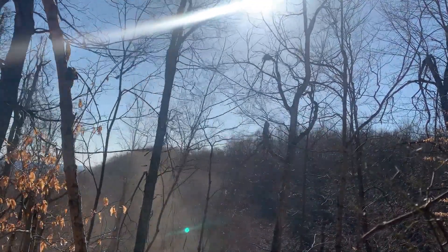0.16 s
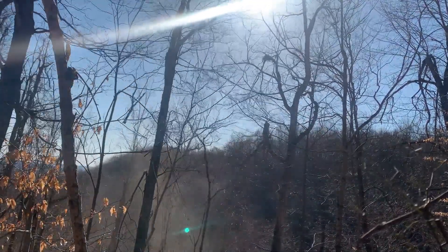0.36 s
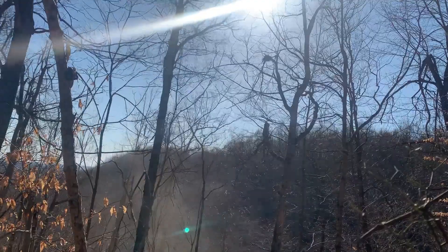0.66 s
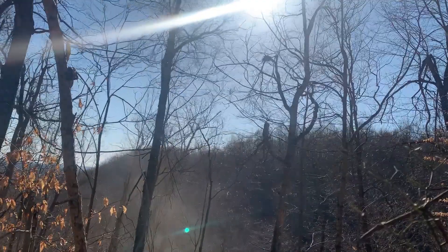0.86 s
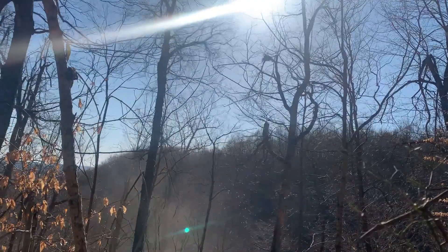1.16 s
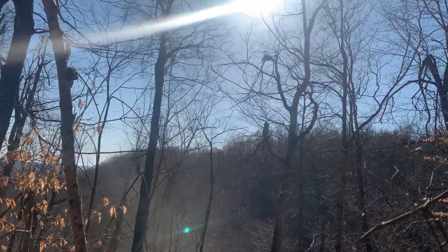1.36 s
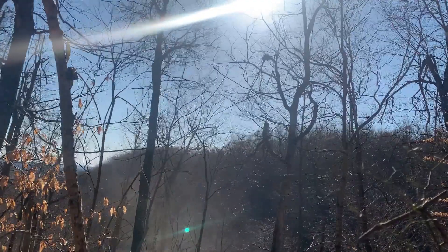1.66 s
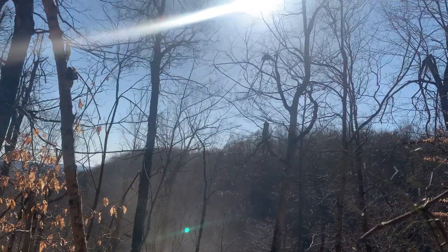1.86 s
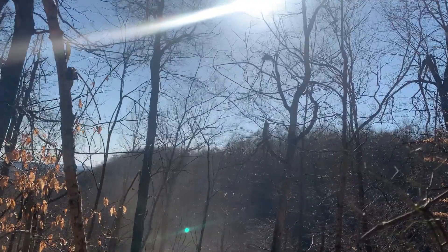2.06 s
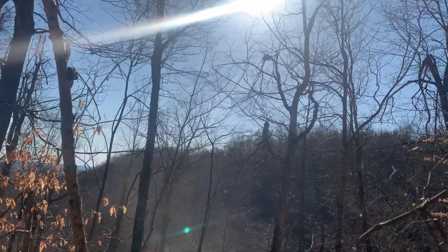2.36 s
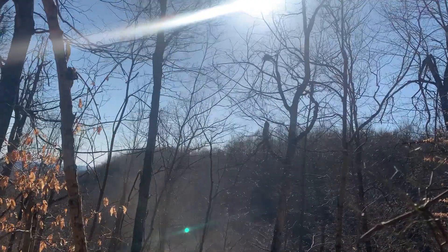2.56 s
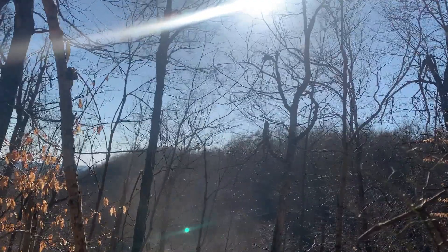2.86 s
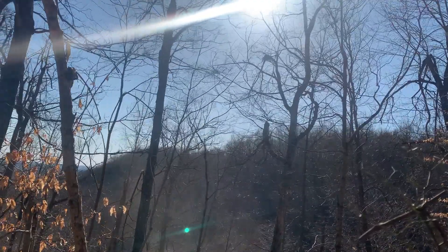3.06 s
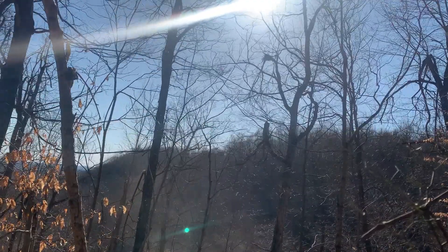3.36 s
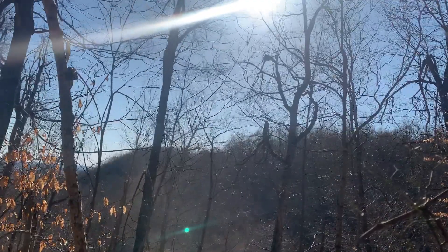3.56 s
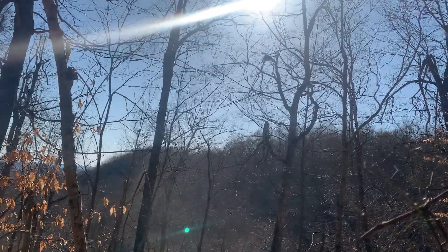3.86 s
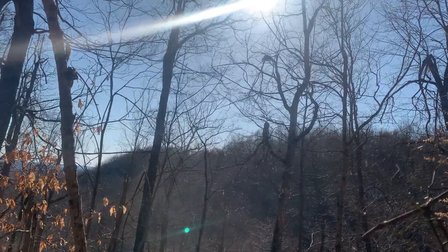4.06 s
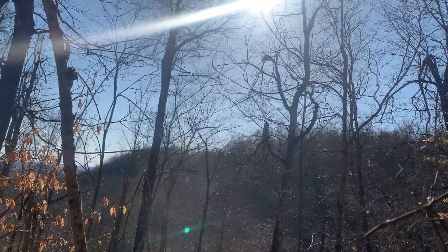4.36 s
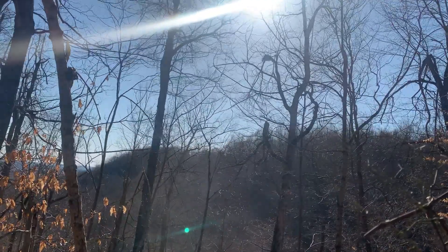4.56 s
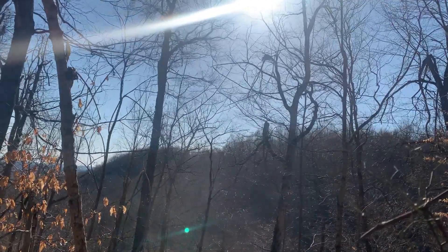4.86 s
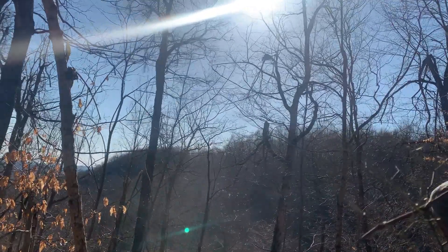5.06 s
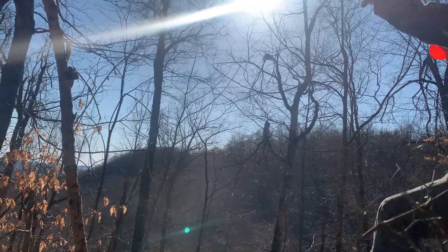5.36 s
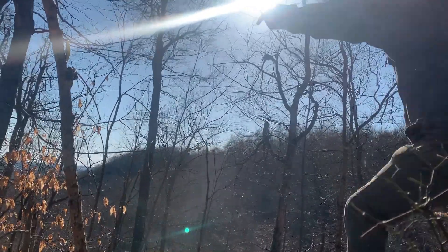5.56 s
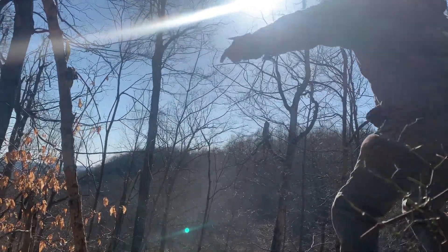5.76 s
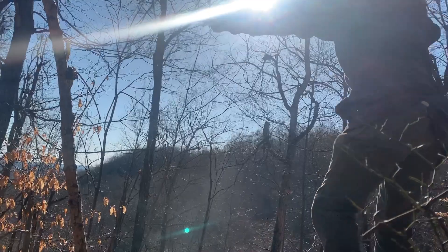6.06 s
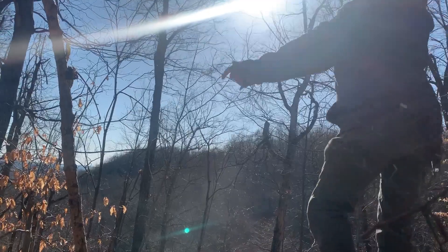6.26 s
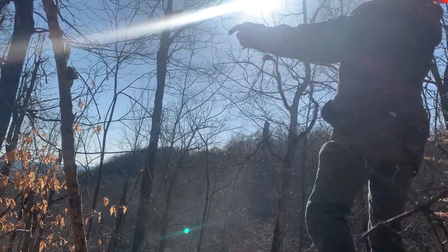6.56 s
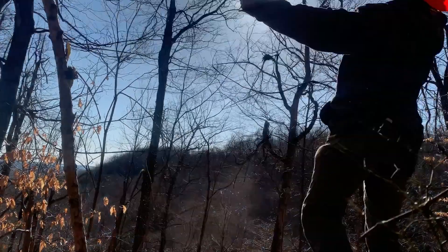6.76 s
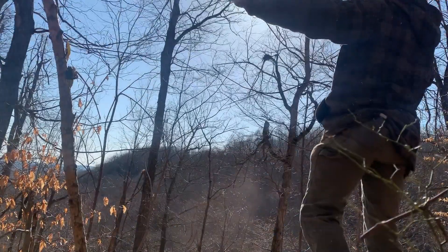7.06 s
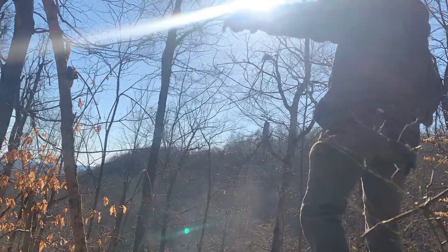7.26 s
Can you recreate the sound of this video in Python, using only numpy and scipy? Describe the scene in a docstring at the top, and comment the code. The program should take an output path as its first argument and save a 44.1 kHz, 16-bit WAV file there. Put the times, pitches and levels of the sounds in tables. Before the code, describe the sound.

Branches snap and heavy wood thuds down in a forest; an engine idles while someone walks in over dry leaves, breaking sticks.

```python
"""A felled tree settles in a winter wood.

Limbs fracture and ring, the trunk thumps the ground, and the many small impacts of falling debris
merge into a fading noise. To the right an idling engine pulses through its exhaust pipe; someone
walks in from that side, crushing dry leaves and snapping twigs. A log is knocked at the left.
Bare trunks scatter the blows, and a phone hears it all through two spaced microphone ports."""
import sys
import numpy as np
from scipy import signal
from scipy.fft import rfft, irfft, next_fast_len
from scipy.io import wavfile
from scipy.ndimage import uniform_filter1d, map_coordinates

SR = 44100
rng = np.random.default_rng(int(sys.argv[2]) if len(sys.argv) > 2 else 0)


def wav_record(signal):
    """Record a signal, one row per channel, as 16-bit PCM in the file named by sys.argv[1]."""
    frames = np.transpose(np.atleast_2d(signal))
    bounded = np.clip(frames, -1, 1)
    # unit amplitude maps onto the largest positive 16-bit level
    quanta = np.round(bounded * 32767).astype(np.int16)
    wavfile.write(sys.argv[1], SR, quanta)


N = 327222

# Engine loudness as heard, dipping at the crash and rising as the phone's gain recovers.
# Each row: time in seconds, level in dB, extra rasp in dB.
ENGINE_AS_HEARD = [(0.0, -37, 0), (0.6, -41, 10), (1.14, -37, 4), (2.2, -36.5, 3), (3.0, -35, 1.5),
                   (3.8, -34.5, 0), (4.1, -34.5, 2.5), (5.2, -32.5, 6), (5.55, -33, 3.5), (5.7, -33.5, 0),
                   (5.85, -32.5, 2.5), (6.15, -30.5, -0.5), (6.35, -33, 3.5), (6.55, -31.5, 2.5),
                   (6.67, -32.5, 0.5), (6.78, -31.5, 2), (6.92, -32, -1), (7.2, -32, -3), (7.35, -32, 5.5),
                   (7.42, -28.5, -1.5)]
# Response of the exhaust pipe. Each row: multiple of the firing rate, relative gain in dB.
PIPE_ORDERS = [(1, -42), (2, -13), (3, 0), (4, 0), (5, -9), (6, -14), (7, -15), (8, -21), (9, -24),
               (10, -25), (11, -30)]
# Spectra of the noise sources. Each row: frequency in Hz, relative spectral density in dB.
ROAR_SPECTRUM = [(25, -28), (33, -9), (55, -6), (75, 0.5), (97, 3), (135, -6), (220, -25.5), (330, -15),
                 (500, -11), (640, -18.5), (750, -24), (1200, -22.5), (2000, -34.5), (6000, -40.5),
                 (16000, -68)]
RASP_SPECTRUM = [(1300, -12), (1600, 0), (2000, 1), (2350, -1.5), (2650, -10.5), (2950, -5.5), (3300, -20),
                 (5000, -38)]
LEAF_SPECTRUM = [(700, -4.5), (1200, -8.5), (1900, 0), (2600, 0.5), (3300, 1.5), (4200, -0.5), (4700, -0.5),
                 (5300, 0), (6500, -3), (7700, -1.5), (9500, -1.5), (11200, -18), (13000, -32)]
DRY_EDGE_SPECTRUM = [(7500, -28), (9500, -37), (10500, 1.5), (11500, -3.5), (13000, 0.5), (16000, 0)]
SOIL_SPECTRUM = [(70, -27), (150, 8.5), (300, 2.5), (500, 0.5), (700, -10.5), (1200, -36)]
TWIG_SPECTRUM = [(1500, -11.5), (2500, -3.5), (5000, -4), (6500, -3.5), (8000, 1), (9600, -5), (11200, -3),
                 (13000, -7), (16000, -11.5)]
LIMB_SPECTRUM = [(200, -19), (450, 0.5), (1000, -1), (1600, 0), (2200, -4), (3500, -9.5), (6000, -13)]
TRUNK_SPECTRUM = [(50, -1), (100, -14.5), (140, 1.5), (220, -3.5), (350, -18), (600, -39)]
# Knocks on the log. Each row: start in seconds, tap level in dB, body level in dB.
LOG_KNOCKS = [(5.39, -15, -22), (5.399, -5.5, -4.5)]
# Leaves stirring round the walker. Each row: time in seconds, levels of leaf, dry edge and soil in dB.
LEAF_STIR = [(2.9, -80, -82, -82), (3.32, -43.5, -46, -51), (3.8, -38, -40.5, -51), (4.9, -42, -46.5, -44),
             (5.12, -47.5, -52, -53.5), (5.9, -57, -53, -59), (6.3, -55.5, -59.5, -58),
             (6.8, -58, -67, -52), (7.05, -68.5, -81, -53.5), (7.42, -53.5, -55, -50.5)]
# Dragged feet. Each row: start and hold in seconds, levels of leaf, dry edge and soil in dB.
FOOTSTEPS = [(3.167, 0.078, -49.5, -66, -43), (3.363, 0.055, -40, -46, -53), (3.424, 0.25, -36, -34, -49.5),
             (3.715, 0.055, -40.5, -47, -42), (3.908, 0.044, -35, -38, -43),
             (4.14, 0.093, -37.5, -36.5, -44), (4.275, 0.051, -43.5, -44, -45),
             (4.616, 0.025, -45.5, -44, -45), (4.882, 0.091, -33.5, -35, -46),
             (5.334, 0.011, -43.5, -50, -44), (5.551, 0.036, -41, -45.5, -49),
             (5.795, 0.018, -46, -53, -67), (5.958, 0.11, -49, -56, -48), (6.47, 0.022, -57.5, -66, -50.5)]
# Waves of collapse. Each row: start and hold in seconds, levels of twig, limb and trunk in dB.
COLLAPSES = [(0.0, 0.15, -52, -41, -42), (0.393, 0.11, -48, -37.5, -39.5), (0.79, 0.039, -54, -38, -56),
             (0.896, 0.039, -39, -60, -47.5), (1.616, 0.026, -59, -47, -54), (2.847, 0.037, -53, -51, -55),
             (3.184, 0.08, -66, -45, -57)]
# Heavy wood striking the ground. Each row: start in seconds, level in dB, pitch in Hz.
GROUND_THUMPS = [(0.039, -20, 103.6), (0.384, -26, 182), (0.417, -19.5, 142), (0.431, -29, 140),
                 (0.458, -29, 180), (0.487, -20, 126), (0.512, -22.5, 192), (0.5317, -12.5, 126),
                 (0.567, -18.5, 120), (0.576, -23.5, 148), (0.612, -26, 103), (0.739, -31, 125),
                 (0.963, -28, 180.5), (1.433, -31, 120), (3.046, -27.5, 184), (3.085, -26, 193),
                 (3.161, -28.5, 251.4), (3.179, -21, 149.5), (3.200, -25, 133), (3.214, -19.5, 102),
                 (3.224, -28.5, 203), (3.694, -30, 101)]
# Twigs snapping. Each row: start in seconds, level before filtering in dB, lower band edge in Hz.
TWIG_SNAPS = [(0.8202, -23, 2800), (1.1002, -49, 2800), (1.419, -31, 6000), (1.8357, -28, 2800),
              (1.857, -30, 4500), (2.946, -29.5, 2800), (3.233, -27, 2000), (3.236, -28, 2000),
              (3.9283, -20, 9000), (3.9655, -32, 2800), (4.1822, -18, 9000), (4.185, -11, 6500),
              (4.187, -18, 6500), (4.187, -18, 3500), (4.192, -24, 5000), (4.196, -24, 2800),
              (4.204, -23, 6000), (4.6486, -28, 2800), (5.3186, -38, 2800), (5.3403, -23, 5030),
              (5.8002, -30, 5000), (5.9166, -14, 3000), (5.921, -40, 2800), (5.932, -28, 5000),
              (5.9397, -29, 5000), (5.983, -31, 5500), (6.044, -26, 2800), (6.0506, -29, 3500),
              (6.1831, -36, 2800), (6.2685, -40, 2800), (6.476, -35.5, 5500), (6.700, -46, 5500),
              (6.709, -31, 3500), (6.917, -44, 5500), (6.942, -44, 3500), (7.013, -46, 11000),
              (7.12, -51, 7000), (7.126, -49, 7000), (7.142, -38, 7000), (7.152, -36, 7000),
              (7.209, -39, 5500), (7.2462, -39, 6500)]
# Limbs cracking. Each row: start in seconds, level in dB, pitch in Hz, hollow knock in dB relative to
# the crack, cycles to decay by 60 dB, splinters in dB relative to the crack.
LIMB_CRACKS = [(.059, -25, 1700, -13, 14, -15), (0.1186, -14, 2070, -19, 11, -14),
               (.325, -10, 1380, -22, 4.5, -29), (0.3502, -5.5, 1590, -15, 5, -21),
               (0.3681, -3.5, 1500, -18, 5, -25), (.385, -20, 1760, -3, 16, -11),
               (0.512, -26, 1500, -11, 18, -22), (.586, -18.5, 1420, -26, 9, -12),
               (0.81, -19.5, 1820, -26, 17, -8), (1.3617, -31, 322, -25, 20, -25),
               (1.363, -27.5, 534, -25, 26, -23), (1.436, -30, 2000, -11, 14, -9),
               (1.549, -21.5, 2100, -25, 21, -15), (1.5522, -25, 1300, -4, 6, -5),
               (1.837, -19.5, 1550, -10, 4, -15), (1.858, -30, 1500, -20, 11, -12),
               (1.867, -32, 2000, -20, 12, -13), (1.934, -27.5, 1660, -11, 22, -18),
               (3.074, -29, 1200, -13, 7, -8), (3.0958, -22.5, 1500, -13, 6, -14),
               (3.143, -39, 940, -20, 12, -8), (3.234, -28, 1500, -10, 6, -3),
               (3.927, -12.5, 2150, -27, 8, -4), (3.930, -22.5, 585, -3, 5, -3),
               (4.041, -26, 1050, -20, 10, -2), (4.1853, -10, 2500, -26, 3, -6),
               (4.1868, -7.5, 3300, -20, 14, -6.5), (4.1905, -18.5, 557, -20, 14, -6),
               (4.5046, -18, 2090, -18, 4, -14), (4.952, -40, 900, 12, 9, -17),
               (5.338, -23, 980, -15, 9, -7), (5.9175, -10, 1140, -20, 7.5, -22),
               (5.935, -32, 1000, -15, 9, -8), (5.939, -31, 1000, 7, 9, -15),
               (5.998, -29, 2150, -26, 16, -3), (6.045, -23, 1300, -2, 7, -6),
               (6.051, -23, 1300, -3, 7, -9), (6.584, -30, 1110, -16, 12, -18)]
# Bearing of the cracks: the tree ahead, then mostly the walker at the right.
# Each row: time in seconds, lag of the left port in milliseconds.
CRACK_LAG_MS = [(0, 0), (3.3, 0), (3.9, .43), (3.95, .43), (4.04, 0), (4.1, .43), (4.8, .43), (5.3, .23),
                (7.42, .21)]
# Reverberation of the wood. Each row: frequency in Hz, time to decay by 60 dB in seconds.
FOREST_T60 = [(100, 0.21), (1000, 0.15), (8000, 0.038)]
# Source directions. Each row: frequency in Hz, phase lead of the left port in radians, coherence.
TREE_DIRECTION = [(0, 1, 0.97), (202, 0.5, 1), (370, -0.5, 0.45), (830, 1, 0.94), (1180, 0.7, 0.22),
                  (2070, -0.3, 0.61), (2600, -3, 0.25), (5920, 1.2, 0.07)]
ENGINE_DIRECTION = [(0, -0.3, 1), (100, -0.27, 0.98), (240, 1, 0.67), (433, -3.5, 1), (610, -6.5, 0.72),
                    (1010, -9, 0.49), (2060, -11.5, 0.97), (3470, -15.5, 0.36), (5370, -20, .4)]
WALKER_DIRECTION = [(0, 0, .95), (200, -.6, .9), (400, -1.1, .6), (1100, -3.14, .4), (2200, -6.28, .88),
                    (3250, -9.42, .7), (4300, -12.57, .93), (5300, -15.6, .45), (6300, -18.55, .85)]
# Likeness of the two ports in the treble. Each row: frequency in Hz, coherence from 0 to 1.
TREBLE_COHERENCE = [(5400, 0.6), (7000, 0.88), (8800, 1), (10500, 1), (11500, .8), (12600, 1), (14200, 1),
                    (15500, .85)]
# Colour of the ports. Each row: frequency in Hz, left level minus right level in dB.
PORT_BALANCE = [(30, -0.4), (100, -0.5), (150, 0), (300, 2), (500, -3), (1000, -1), (1500, 1.3),
                (3200, 1.5), (5000, 1.2), (6500, 0)]

FIRING_HZ, FIRST_FIRING_S, PIPE_NODE_HZ = 21.1, 0.0215, 101.4
ROAR_DB, RASP_DB = -8.5, -19.5  # relative to the exhaust hum
DEBRIS_DB, THINNING_DB_PER_S = [-36, -35.5, -51], [4.5, 7, 1.4]  # twigs, limbs, trunk
SETTLED_S, DYING_DB_PER_S = 3, 11  # a further decay once the crown has settled
HOLLOW_HZ, CRACK_RISE_CYCLES = 533, 0.57
LOW_CUT_HZ, TOP_HZ = 33, 15780


def amp(db):
    """Amplitude ratio of a level in decibels."""
    return 10 ** (np.asarray(db) / 20)


def decay(t, t60_s, db=0):
    """Exponential damping: a level of db falls by 60 dB in each t60_s."""
    return amp(db - 60 * t / t60_s)


def unit_rms(x):
    """Normalisation to unit mean power."""
    return x / np.sqrt(np.mean(x ** 2) + 1e-20)


def log_interp(points, hz):
    """Interpolation of (Hz, value) points on a logarithmic frequency axis."""
    freqs, values = np.transpose(points)
    return np.interp(np.log(hz + 1), np.log(freqs + 1), values)


def curves(rows):
    """Linear interpolation, sample by sample, of each column after the time."""
    times, *columns = np.transpose(rows)
    return [np.interp(np.arange(N) / SR, times, column) for column in columns]


def wobble(rate):
    """Smooth random modulation: a spline through rate Gaussian values a second."""
    knots = rng.standard_normal(int(N * rate / SR) + 4)
    return map_coordinates(knots, [np.arange(N) * rate / SR])


def filtered(x, response):
    """Linear filtering: the spectrum is multiplied by a complex function of frequency."""
    size = next_fast_len(N + SR // 5)
    return irfft(rfft(x, size) * response(np.fft.rfftfreq(size, 1 / SR)), size)[..., :N]


def minimum_phase(db):
    """Causality: folding the cepstrum onto positive time gives a phase to these FFT-bin levels."""
    cepstrum = irfft(np.log(amp(db)))
    half = len(cepstrum) // 2 - 1
    return np.exp(rfft(cepstrum * np.r_[1, np.full(half, 2), 1, np.zeros(half)]))


def add(track, start_s, sound):
    """Superposition of a sound on a track."""
    at = round(start_s * SR)
    track[at:at + len(sound)] += sound[:len(track) - at]


def noise(spectrum, grains_per_s=0, spread_db=0, patchy_db=0):
    """Modulated noise (direct, left, right): random grains crackle, and each band swells and fades."""
    hits = (rng.random(N) < grains_per_s / SR) * amp(spread_db * np.minimum(rng.exponential(size=N), 3))
    grains = signal.lfilter([1], [1, -.97], hits)  # each dies within a millisecond or two
    bands = signal.stft(rng.standard_normal((3, N)) * (1 + grains), nperseg=512)[2]
    patches = uniform_filter1d(rng.standard_normal(bands.shape[1:]), size=4, axis=0)
    patches = unit_rms(uniform_filter1d(patches, size=6, axis=1))
    patchy = signal.istft(bands * amp(patchy_db * patches), nperseg=512)[1][:, :N]
    return unit_rms(filtered(patchy, lambda hz: amp(log_interp([(1, -120)] + spectrum, hz))))


def swells(bed_db, events, rise_db_per_s, fall_db_per_s):
    """Incoherent sounds add in power: gains of a bed plus swells that peak at their start, hold, fall."""
    t, power = np.arange(N) / SR, amp(bed_db) ** 2
    for start, hold, *levels_db in events:
        flanks_db = np.minimum(rise_db_per_s * (t - start), fall_db_per_s * (start + hold - t))
        power = power + amp(np.minimum(0, flanks_db)) ** 2 * amp(levels_db)[:, None] ** 2
    return np.sqrt(power)


def scattered(x, wet_db):
    """Scattering among trunks adds echoes whose treble dies first. Returns direct, left and right."""
    hz, t, bands = signal.stft(rng.standard_normal((2, SR // 2)), SR, nperseg=256)
    tail = signal.istft(bands * decay(t, log_interp(FOREST_T60, hz)[:, None]), SR, nperseg=256)[1]
    echoes = signal.fftconvolve(x[None], tail / np.linalg.norm(tail[0]), axes=1)[:, :N]
    return np.vstack([x, amp(wet_db) * echoes])


def spaced_ports(source, direction, pointlike=False):
    """Path difference sets the phase between ports; coherence divides direct from diffuse power."""
    freqs, lead, coherence = np.transpose(direction)
    split_hz = freqs[-1]

    def response(hz):
        # Above the split, the phase joins that of one delay common to all directions.
        treble_lead = lambda f: 2 * np.pi * (f - 13250) / 7200
        offset = lead[-1] - treble_lead(split_hz)
        whole_turns = 2 * np.pi * np.round(offset / (2 * np.pi))
        join = np.interp(hz, [split_hz, split_hz + 500], [offset, whole_turns])
        phase = np.where(hz < split_hz, np.interp(hz, freqs, lead), join + treble_lead(hz))
        return np.exp(.5j * np.array([[1], [-1]]) * phase)

    def direct_share(hz):
        share = np.where(hz < split_hz, np.interp(hz, freqs, coherence), log_interp(TREBLE_COHERENCE, hz))
        return np.clip(share, 0, 1)

    if pointlike:  # a single track, arriving fully coherent
        return filtered(source, response)
    direct = filtered(source[0], lambda hz: np.sqrt(direct_share(hz)) * response(hz))
    return direct + filtered(source[1:], lambda hz: np.sqrt(1 - direct_share(hz)))


def engine():
    """Source and filter: uneven firings drive the pipe's harmonics; roar and rasp throb once a firing."""
    level, rasp_gain = amp(curves(ENGINE_AS_HEARD))
    cycles = (np.arange(N) / SR - FIRST_FIRING_S) * FIRING_HZ
    firings = (np.diff(np.floor(cycles), prepend=0) > 0) * amp(rng.standard_normal(N))
    pipe = [(0.74, -63)] + [(k * FIRING_HZ, db) for k, db in PIPE_ORDERS] + [(400, -78), (1500, -140)]
    # Past the pipe's node the upper orders come out almost a whole cycle late.
    node_lag = lambda hz: -np.exp(-2j * np.pi * .97 / (1 + (PIPE_NODE_HZ / (hz + 1)) ** 19))
    hum = unit_rms(filtered(firings, lambda hz: minimum_phase(log_interp(pipe, hz)) * node_lag(hz)))
    throb = amp(np.cos(2 * np.pi * (cycles - .3)) + 2.0 * wobble(4.3))
    roar = amp(ROAR_DB) * noise(ROAR_SPECTRUM, patchy_db=1.9)
    rasp = amp(RASP_DB) * rasp_gain * noise(RASP_SPECTRUM, patchy_db=1.8)
    return level * (hum * [[1], [0], [0]] + throb * (roar + rasp))  # the hum is direct sound only


def log_knocks():
    """Dispersion: high bending waves outrun low ones, so a falling tap arrives before the low body."""
    out, t = np.zeros(N), np.arange(SR // 5) / SR
    tap_cycles = 330 * t + 1.24 * (1 - np.exp(-t / 0.0012))  # glides down to 330 Hz
    rise = 1 - np.exp(-t / 0.0017)
    for start, tap_db, body_db in LOG_KNOCKS:
        add(out, start, -decay(t, t60_s=0.023, db=tap_db) * rise * np.sin(2 * np.pi * tap_cycles))
        add(out, start + 0.0072, decay(t, t60_s=0.054, db=body_db) * rise * np.sin(2 * np.pi * 96 * t))
    return out


def walker():
    """Friction and fracture: dry leaves crackle under dragged feet, over a dull shuffle of soil."""
    leaf, edge, soil = swells(curves(LEAF_STIR), FOOTSTEPS, rise_db_per_s=119, fall_db_per_s=143)
    crunch = amp(0.89 * wobble(30))
    leaves = leaf * crunch * noise(LEAF_SPECTRUM, grains_per_s=300, spread_db=-4.0, patchy_db=1.65)
    edges = edge * crunch * noise(DRY_EDGE_SPECTRUM, grains_per_s=400, spread_db=-3.0, patchy_db=0.8)
    shuffle = soil * amp(0.7 * wobble(24)) * noise(SOIL_SPECTRUM)
    return leaves + edges + shuffle


def debris():
    """Random impacts sum to noise: twigs hiss, limbs rattle and the trunk rumbles as the crown settles."""
    t = np.arange(N) / SR
    bed_db = np.c_[DEBRIS_DB] - np.c_[THINNING_DB_PER_S] * t
    bed_db -= DYING_DB_PER_S * np.maximum(t - SETTLED_S, 0)
    twig, limb, trunk = swells(bed_db, COLLAPSES, rise_db_per_s=64, fall_db_per_s=24)
    twig *= amp(0.2 * wobble(8.2))
    hiss = twig * noise(TWIG_SPECTRUM, grains_per_s=210, spread_db=-5.5, patchy_db=2.0)
    limb *= amp(0.34 * wobble(20))
    rattle = limb * noise(LIMB_SPECTRUM, grains_per_s=300, spread_db=-3.5, patchy_db=2.13)
    rumble = trunk * amp(3.9 * wobble(24.75)) * noise(TRUNK_SPECTRUM)
    return hiss + rattle + rumble


def trunk_thumps():
    """Damped oscillation: under a soft, heavy blow the ground swells for a few ms and rings briefly."""
    out, t = np.zeros(N), np.arange(SR // 4) / SR
    rise = 1 - np.exp(-t / 0.0021)
    for start, db, hz in GROUND_THUMPS:
        add(out, start, decay(t, t60_s=0.13, db=db) * rise * np.sin(2 * np.pi * hz * t))
    return out


def twig_snaps():
    """A brief event has a broad spectrum: each breaking twig gives a burst of treble noise."""
    out, t = np.zeros(N), np.arange(SR // 20) / SR
    for start, db, low_hz in TWIG_SNAPS:
        burst = decay(t, t60_s=0.0067, db=db) * rng.standard_normal(len(t))
        band = signal.butter(2, [low_hz, 14000], "band", fs=SR, output="sos")
        add(out, start, signal.sosfilt(band, burst))
    return out


def limb_cracks():
    """Fracture excites free vibration: a woody ring, a hollow knock and splinters, timed for each port."""
    out, t = np.zeros((2, N)), np.arange(SR // 20) / SR
    hollow = decay(t, t60_s=0.01) * np.sin(2 * np.pi * HOLLOW_HZ * t)
    for start, db, hz, knock_db, cycles, splinters_db in LIMB_CRACKS:
        splinters = rng.standard_normal(len(t)) * decay(t, t60_s=0.03, db=splinters_db)
        rise = 1 - np.exp(-t * hz / CRACK_RISE_CYCLES)
        ring = decay(t, t60_s=cycles / hz) * rise * np.sin(2 * np.pi * hz * t)
        crack = -amp(db) * (ring + amp(knock_db) * hollow + splinters)
        lag_s = np.interp(start, *np.transpose(CRACK_LAG_MS)) / 1000
        add(out[0], start + lag_s / 2, crack)
        add(out[1], start - lag_s / 2, crack)
    return signal.sosfilt(signal.butter(4, 4300, fs=SR, output="sos"), out)


def scene():
    """Superposition at the ports: the tree ahead, engine and walker to the right, the log to the left."""
    cracks, snaps = limb_cracks(), twig_snaps()
    limbs = cracks + scattered(cracks.mean(axis=0), wet_db=-11.0)[1:]
    twigs = scattered(snaps, wet_db=-11.5)[:2].sum(axis=0)  # echoes come from the snap's own side
    knocks = scattered(log_knocks(), wet_db=-16.0)
    far_port = np.roll(knocks[0], round(0.00027 * SR))
    log = np.array([knocks[0], far_port]) + knocks[1:]
    tree = spaced_ports(debris() + scattered(trunk_thumps(), wet_db=-3.5), TREE_DIRECTION)
    motor = spaced_ports(engine(), ENGINE_DIRECTION)
    steps = spaced_ports(walker(), WALKER_DIRECTION)
    in_tree = np.arange(N) < 2.5 * SR  # later twigs snap underfoot
    tree += spaced_ports(twigs * in_tree, TREE_DIRECTION, pointlike=True)
    steps += spaced_ports(twigs * ~in_tree, WALKER_DIRECTION, pointlike=True)
    return motor + log + steps + tree + limbs


def record(dry):
    """Frequency response: the ports differ in colour; the phone cuts deep bass and the highest treble."""
    colour = lambda hz: amp(np.array([[.5], [-.5]]) * log_interp(PORT_BALANCE, hz))
    low_cut = lambda hz: 1 / np.sqrt(1 + (LOW_CUT_HZ / (hz + 1)) ** 8)
    return filtered(dry, lambda hz: colour(hz) * low_cut(hz) * (hz < TOP_HZ))


dry = scene()
out = record(dry)
wav_record(out)
```